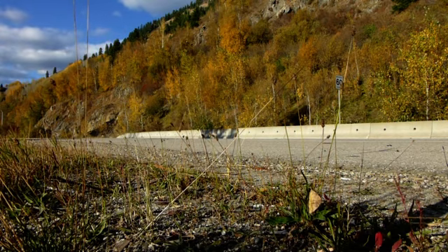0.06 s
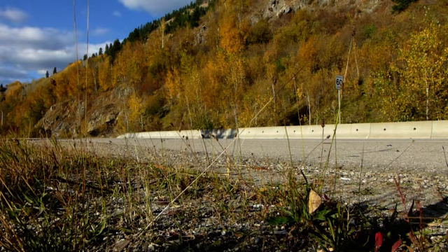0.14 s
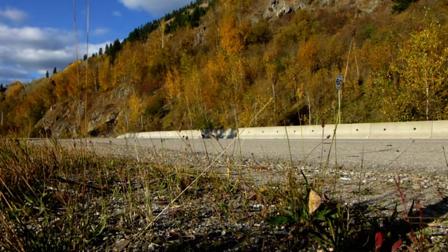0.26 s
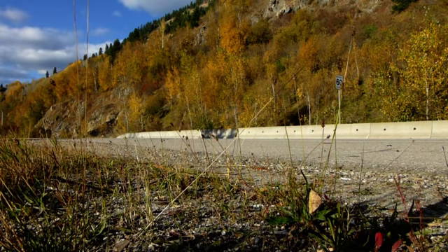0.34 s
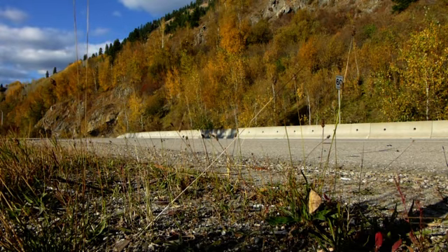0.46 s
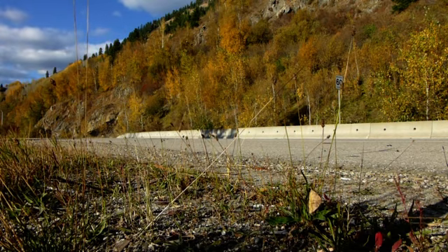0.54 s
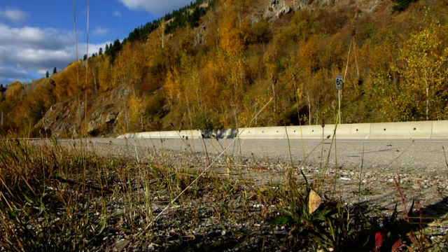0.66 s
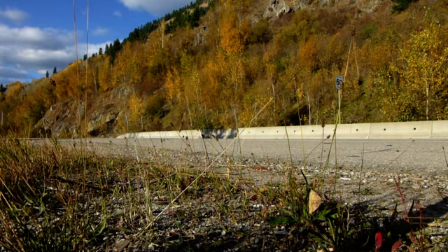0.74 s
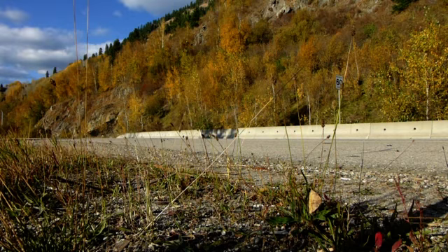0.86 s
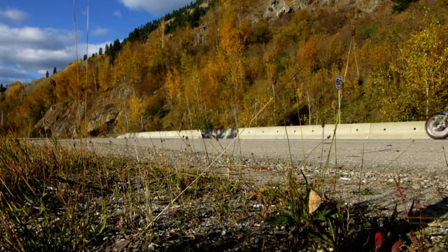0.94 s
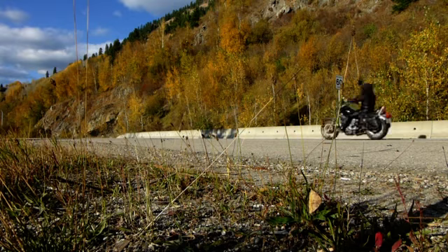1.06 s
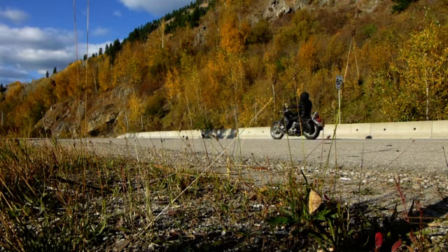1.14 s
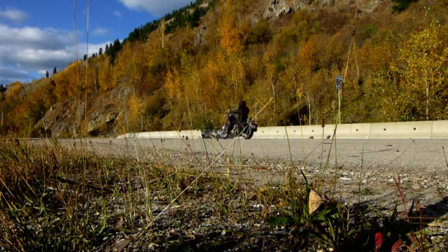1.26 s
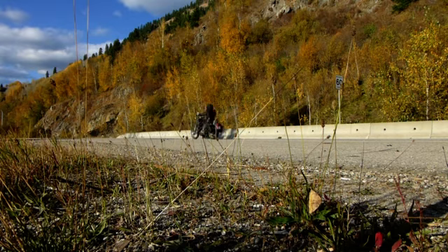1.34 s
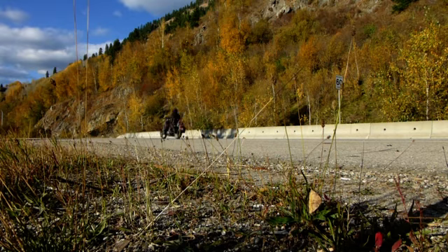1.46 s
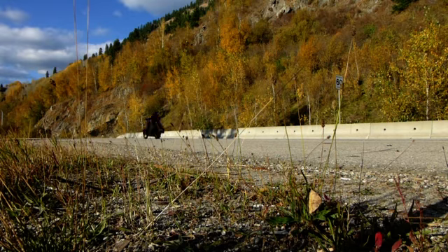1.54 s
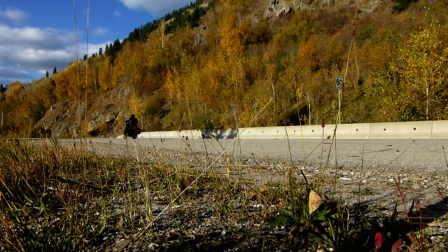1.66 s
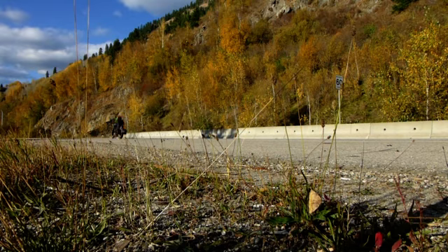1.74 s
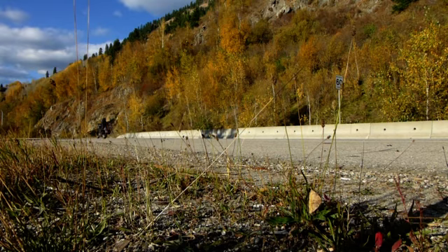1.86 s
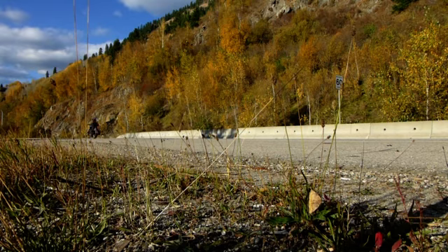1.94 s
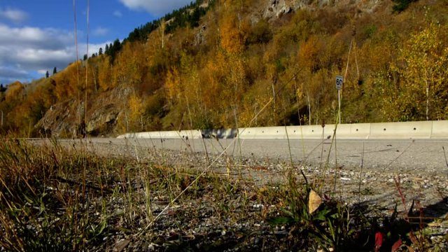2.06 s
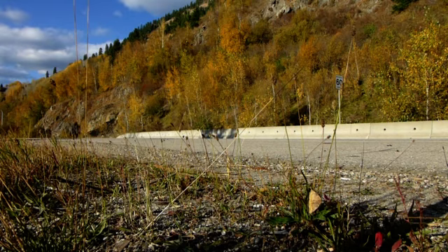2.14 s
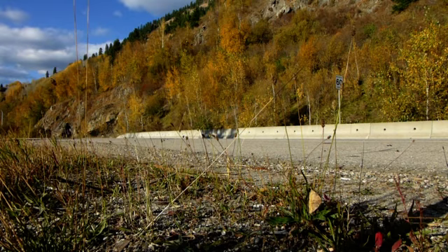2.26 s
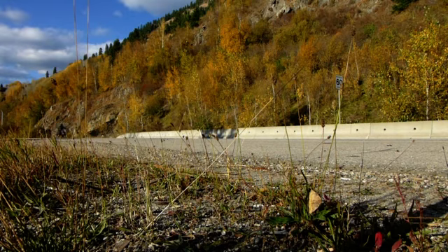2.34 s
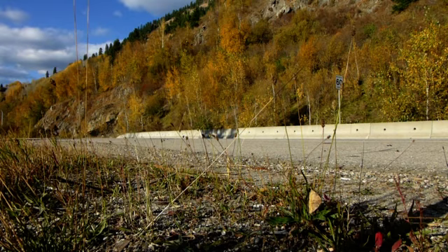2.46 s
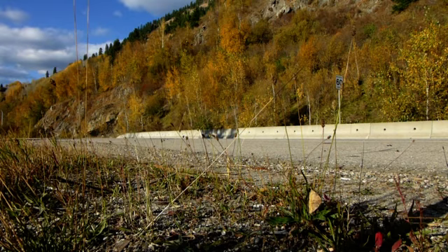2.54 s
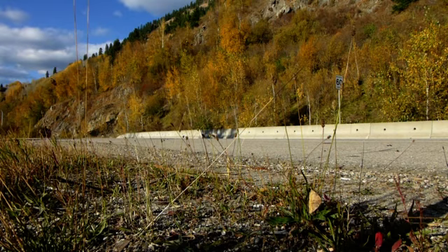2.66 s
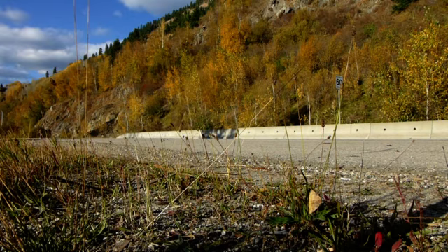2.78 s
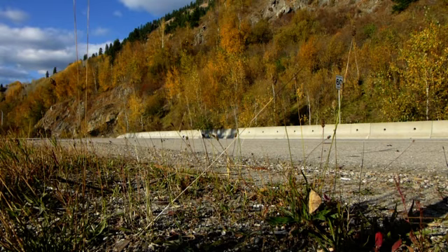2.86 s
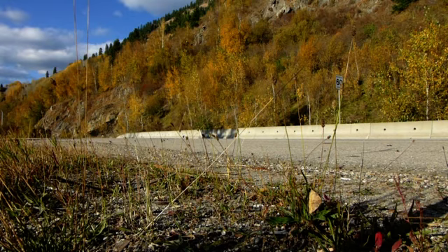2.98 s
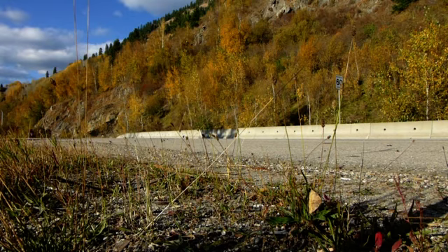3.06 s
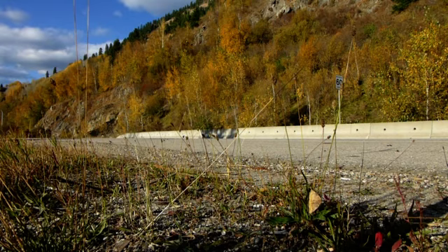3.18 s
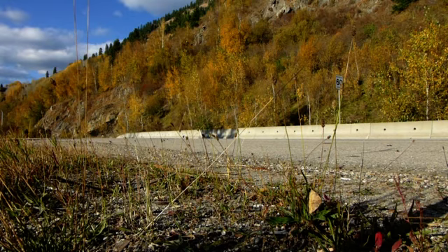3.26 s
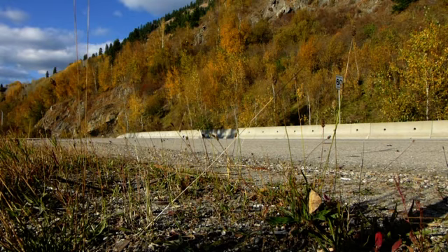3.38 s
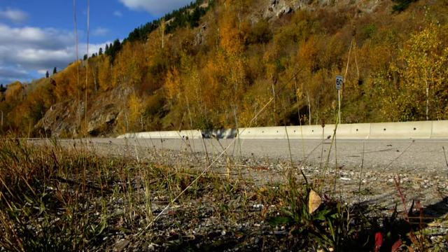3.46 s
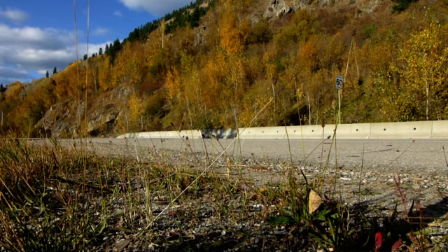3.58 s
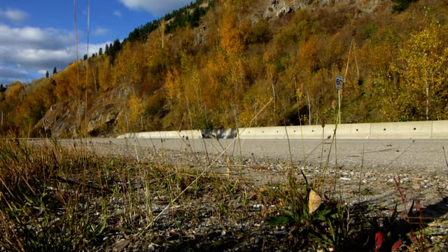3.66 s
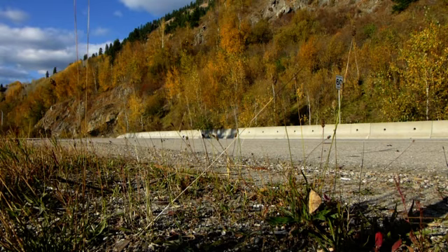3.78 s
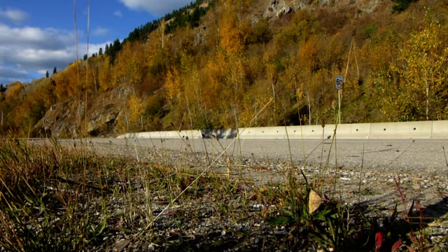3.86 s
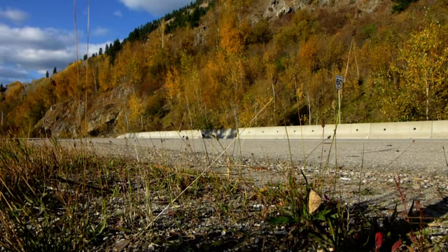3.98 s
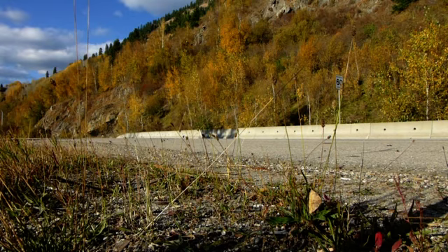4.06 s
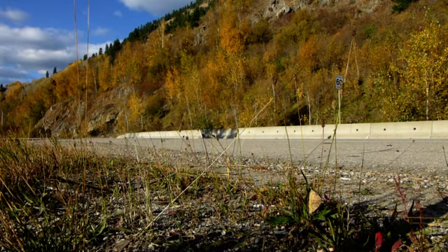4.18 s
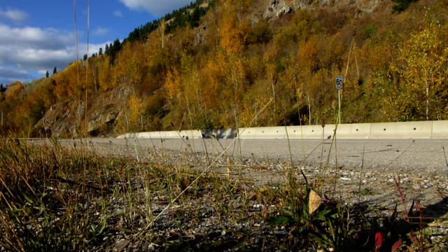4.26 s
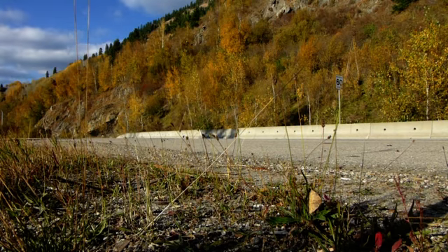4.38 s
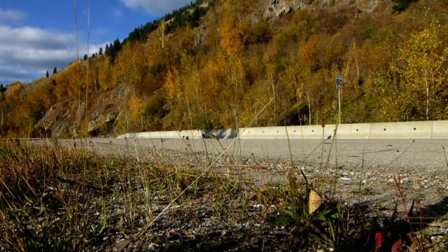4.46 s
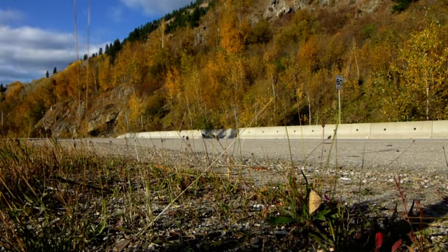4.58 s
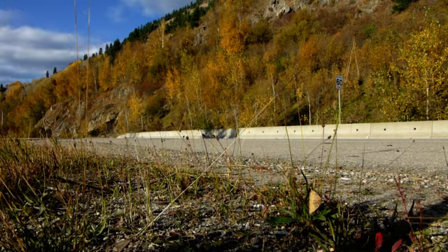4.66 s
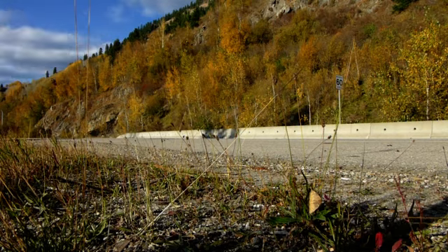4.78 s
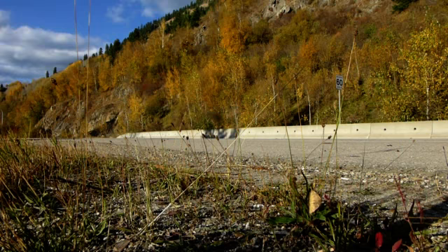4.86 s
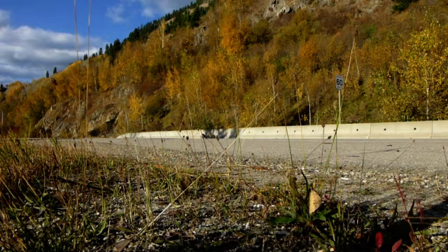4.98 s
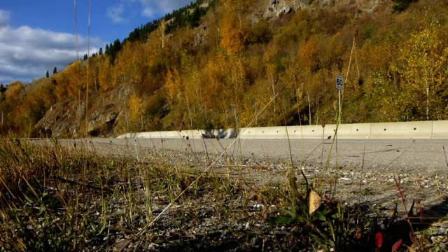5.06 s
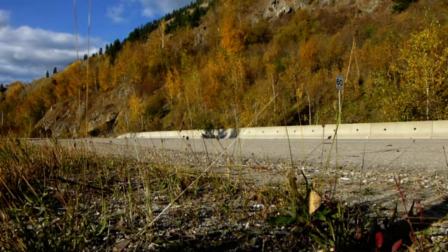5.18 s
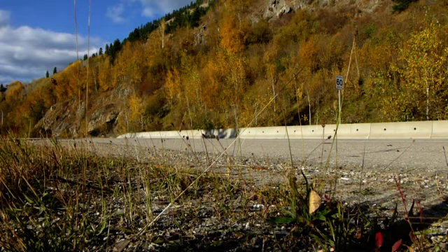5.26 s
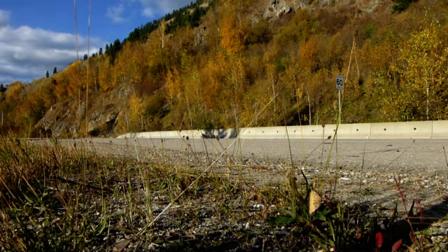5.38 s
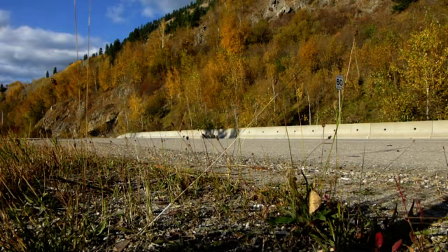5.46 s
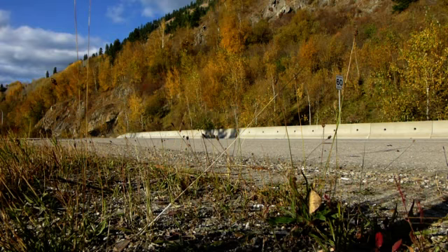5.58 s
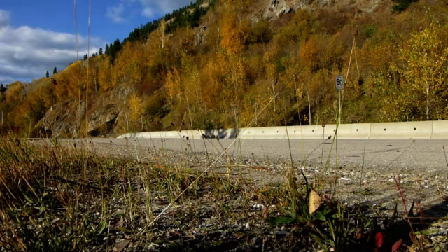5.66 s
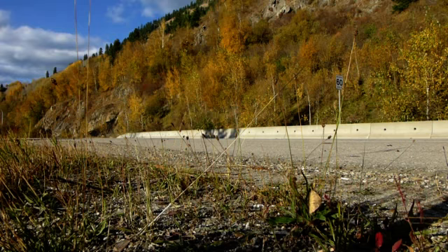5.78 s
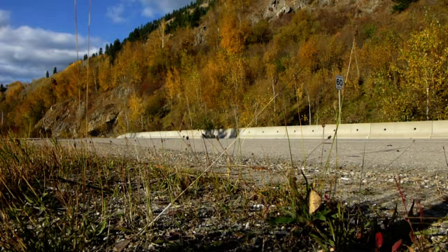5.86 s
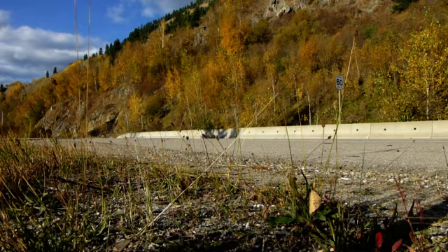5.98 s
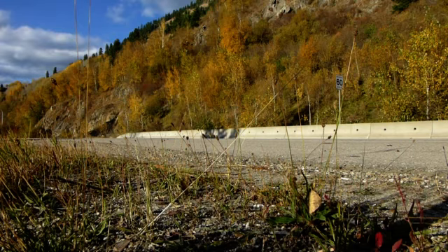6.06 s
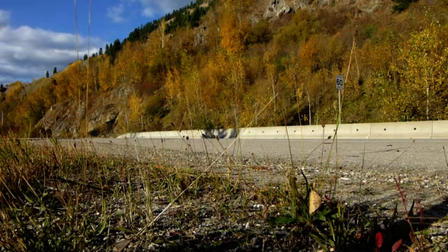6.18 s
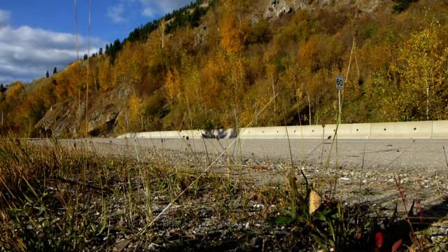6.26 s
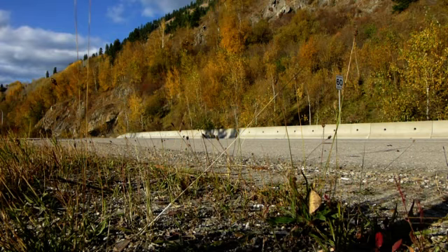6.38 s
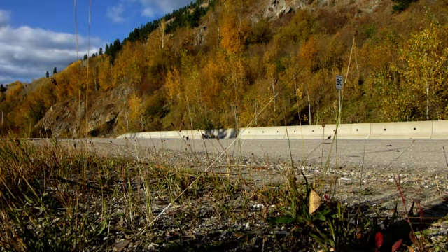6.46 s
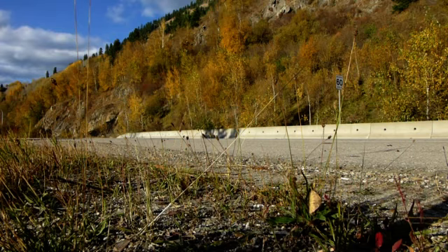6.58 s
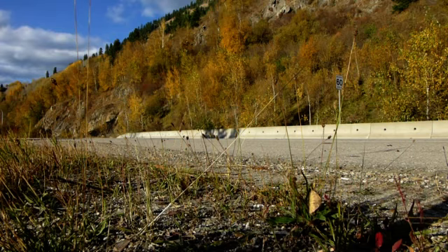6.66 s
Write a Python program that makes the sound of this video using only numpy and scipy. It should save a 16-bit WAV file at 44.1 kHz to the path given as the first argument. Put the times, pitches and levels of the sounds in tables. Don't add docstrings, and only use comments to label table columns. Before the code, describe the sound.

A twin-cylinder motorcycle roars past from right to centre, shifts gear, coasts off and backfires, then another rolls up idling with a thin brake squeal.

```python
import sys
import numpy as np
from scipy import signal
from scipy.fft import rfft, irfft, next_fast_len
from scipy.io import wavfile
from scipy.ndimage import uniform_filter1d

SR = 44100
rng = np.random.default_rng(int(sys.argv[2]) if len(sys.argv) > 2 else 0)


def persist_wave(psi):
    counts = np.round(np.clip(psi, -1, 1) * 32767).astype(np.int16)
    wavfile.write(sys.argv[1], SR, np.atleast_2d(counts).T)


def convert_level_to_amplitude(level_db):
    exponent = np.asarray(level_db, float) / 20
    return 10 ** exponent


N = 296339

FIRST_FIRING, SECOND_CYLINDER = .1, 5 / 12
SHUT_S = (2.11, 2.29)
CENTRED_S = 1.24
# (time [s], column of the order table [index], level [dB])
STAGES = [
    (0, 0, 0),
    (.74, 1, -3),
    (.935, 0, 1),
    (1.14, 2, 0),
    (2.29, 3, -1),
]

IDLE_STARTS_S = 4.486
BRAKE_RELEASE_S = 5.16


def seconds():
    return np.arange(N) / SR


def in_time(rows):
    s, *columns = np.transpose(rows)
    return [np.interp(seconds(), s, c) for c in columns]


def stage_rows():
    return np.searchsorted(np.transpose(STAGES)[0], seconds(), "right") - 1


def by_stage(table, size):
    return uniform_filter1d(np.array(table, float)[stage_rows()].T, size=size, axis=1)


def rms_one(x):
    return x / np.sqrt(np.mean(x ** 2) + 1e-20)


def evened(x):
    return x / np.sqrt(uniform_filter1d(x ** 2, size=6000) + 1e-9)


def cut(x, hz, kind, order=2):
    return signal.sosfilt(signal.butter(order, hz, kind, fs=SR, output="sos"), x)


def coloured(spectrum):
    hz, db = np.transpose(spectrum)
    size = next_fast_len(N)
    bin_hz = np.arange(size // 2 + 1) * SR / size
    gain = convert_level_to_amplitude(np.interp(np.log(bin_hz + 1), np.log(hz), db))
    return rms_one(irfft(rfft(rng.standard_normal(size)) * gain, size)[:N])


def clicks_at(at_s, sizes):
    out = np.zeros(N)
    at = np.round(np.asarray(at_s) * SR).astype(int)
    inside = (at >= 0) & (at < N)
    np.add.at(out, at[inside], (sizes * np.ones(len(at)))[inside])
    return out


def fall(clicks, decay_s):
    return signal.lfilter([1], [1, -np.exp(-1 / (decay_s * SR))], clicks + 1e-18)


def ring(clicks, modes):
    out = 0
    for k, (hz, db, t60_s) in enumerate(modes):
        r, w = convert_level_to_amplitude(-60 / (t60_s * SR)), 2 * np.pi * hz / SR
        mode = signal.lfilter([0, convert_level_to_amplitude(db) * np.sin(w)], [1, -2 * r * np.cos(w), r * r], clicks + 1e-18)
        out = out + (-1) ** k * mode
    return out


def orders(turns, lag=.65, centre=8.0):
    # (multiple of cycle rate [1], approaching [dB], throttle shut [dB],
    # pulling away [dB], coasting [dB])
    order_db = [(2, -15, -16, -26, -28), (3, -35, -11.5, -21, -9), (4, -7.5, -11, -12, -5),
                (5, 0.5, -6.5, -1, 2.5), (6, -2.5, -13, -24, -10.5), (7, 3.5, 0, 3, -4.5),
                (8, -9, 1.5, -1.5, -4), (9, -6.5, 0.5, -6, -2.5), (10, -26, 5, -5, 4),
                (11, -7.5, -9, -22, -15.5), (12, -6, -11, -1.5, -1), (13, -15.5, -27, -9.5, -11.5),
                (14, -27, -22, -5, -11), (15, -9, -25, -9, -24.5), (16, -28, -42, -10, -19.5),
                (17, -25, -26, -33, -3.5), (18, -23, -35, -18, -19.5), (19, -20, -11, -44, -11)]
    k, *levels = np.transpose(order_db)
    _, stage, stage_db = np.transpose(STAGES)
    row = stage_rows()
    cycle, out = np.arange(1025) / 1024, 0
    for n, db in enumerate(levels):
        waves = FIRST_FIRING + SECOND_CYLINDER * np.array([1, 2, 3] if n % 2 else [0, 1])
        phase = np.angle(np.exp(-2j * np.pi * np.outer(k, waves)).sum(axis=1))
        phase -= 1.4 + lag * np.tanh((k - centre) / 3)
        shape = rms_one(convert_level_to_amplitude(db) @ np.cos(2 * np.pi * np.outer(k, cycle) + phase[:, None]))
        gate = uniform_filter1d(convert_level_to_amplitude(stage_db[row]) * (stage[row] == n), size=900)
        out = out + gate * np.interp(turns % 1, cycle, shape)
    return out


def exhaust_bark(blasts, upper_db):
    # (frequency [Hz], level [dB], t60 [s])
    throat_modes = [(593, 4, 0.012), (867, -2, 0.03)]
    # (frequency [Hz], level [dB], t60 [s])
    upper_modes = [(1090, 3, 0.012), (1950, -8.5, 0.005)]
    throat_db = np.interp(seconds(), (CENTRED_S, SHUT_S[1]), (-7, 2))
    lower = evened(convert_level_to_amplitude(throat_db) * ring(blasts, throat_modes[:1]) - ring(blasts, throat_modes[1:]))
    bark = lower + convert_level_to_amplitude(upper_db + 16) * evened(ring(blasts, upper_modes))
    return evened(cut(cut(bark, 370, "high"), 2640, "low", order=4))


def reflected(layer, echo_db):
    # (time [s], delay [s])
    delays = [
        (0, .010),
        (.72, .0265),
        (1.15, .030),
        (1.3, .028),
        (2.28, .011),
    ]
    delay_s, = in_time(delays)
    late = np.interp(np.arange(N) - delay_s * SR, np.arange(N), layer)
    return (layer + convert_level_to_amplitude(echo_db) * late) / np.sqrt(1 + convert_level_to_amplitude(2 * echo_db))


def receding(top_db, coming, going):
    closest_s, pass_s, shut_loss_db = 0.99, 0.31, 6.5
    t = seconds() - closest_s
    loss_db = 10 * np.log10(1 + (t / pass_s) ** 2)
    return top_db - np.where(t < 0, coming, going) * loss_db - np.interp(seconds(), SHUT_S, [0, shut_loss_db])


def flow_noise(gusts):
    # (frequency [Hz], density [dB per Hz])
    jet_spectrum = [(710, -3), (1200, -9), (1310, -6), (1540, -7.5), (3160, -18), (4060, -21.5),
                    (4380, -32), (5000, -25), (6500, -45), (11000, -120)]
    # (frequency [Hz], density [dB per Hz])
    rush_spectrum = [(1880, -7.5), (3200, -12), (4400, -6), (4860, -6), (10500, -15), (11700, -19.5),
                     (12800, -39), (16600, -62), (22000, -120)]
    # (frequency [Hz], level [dB], t60 [s])
    case_modes = [(873, -3.5, 0.064), (1150, 1.5, 0.036), (1712, -14, 0.061), (2473, -11.5, 0.057),
                  (2718, -14, 0.069), (3180, -9.5, .04)]
    road_db = -68.5
    jet = convert_level_to_amplitude(receding(-27, 0.29, 0.92)) * evened((1.4 + gusts) * coloured(jet_spectrum))
    rush_gain = np.hypot(convert_level_to_amplitude(receding(-36, 0.99, 1.344)), convert_level_to_amplitude(road_db))
    rush = rush_gain * evened((0.5 + gusts) * coloured(rush_spectrum))
    shaken = ring(gusts * rng.standard_normal(N), case_modes)
    cases = convert_level_to_amplitude(receding(-30, 0.76, 1.94)) * evened(cut(shaken, 730, "high", order=4))
    return jet + rush + cases


def passing(lead_s=0.0904, rear_db=1.5):
    # (time [s], four-stroke cycle rate [1/s])
    cycle_rate = [(0, 39.07), (.76, 39.11), (.94, 34.31), (1.0, 36.72), (1.055, 42.91), (1.16, 29.97),
                  (1.5, 28.87), (2.15, 28.77), (2.3, 28.33), (3.0, 27.64), (4.6, 24.19)]
    # (time [s], level [dB])
    exhaust_level = [(0, -15), (.27, -12.5), (.75, -13), (.93, -12.5), (1.3, -17.5), (1.52, -14),
                     (2.13, -16.5), (2.42, -26.5), (2.95, -27), (3.3, -29), (4.11, -27.5), (4.5, -30.5)]
    # (turbulence [dB], crispness [0-1], bark [dB],
    # upper bark [dB], reflection [dB])
    burns = [(-10.5, 0.44, -16.5, -17, -8), (-10, 0.3, -12, -19, -15), (-8.5, 0.8, -13.5, -7, -24),
             (-9.5, 0.71, -12, -21.5, -8), (-8.5, 0.18, -11.5, -22.5, -20.5)]
    # (frequency [Hz], level [dB], t60 [s])
    pipe_modes = [(146, -24.5, 0.11), (193, 3, 0.022), (269, -3.5, 0.05), (362, 2, 0.032),
                  (483, -5.5, 0.038)]
    tone_db, = in_time(exhaust_level)
    swirl_db, crisp, bark_db, upper_db, echo_db = by_stage(burns, size=3000)
    crisp = np.clip(crisp, 0, 1)

    turns = np.cumsum(in_time(cycle_rate)[0]) / SR
    jitter, burn_db = rng.standard_normal((2, 400))
    fired = np.add.outer(np.arange(200), [0, SECOND_CYLINDER]).ravel() + FIRST_FIRING
    at_s = np.interp(fired - lead_s, turns, seconds(), right=99) + .00007 * jitter
    pulses = clicks_at(at_s, convert_level_to_amplitude(np.tile([0, rear_db], 200) + .8 * burn_db))
    gusts = evened(1.3 * (1 - crisp) + crisp * evened(fall(pulses, 0.0046)))

    tone = orders(turns) * convert_level_to_amplitude(np.interp(turns, fired, burn_db))
    swirl = ring(gusts * rng.standard_normal(N), pipe_modes)
    tone += convert_level_to_amplitude(swirl_db) * evened(cut(swirl, 120, "high"))
    blasts = crisp * evened(pulses) + (1 - crisp) * gusts * rng.standard_normal(N)
    bark = exhaust_bark(blasts, upper_db)

    out = convert_level_to_amplitude(tone_db) * reflected(tone, echo_db)
    out += convert_level_to_amplitude(tone_db + bark_db) * reflected(bark, echo_db)
    out += flow_noise(gusts)
    return out * np.interp(seconds(), (4.56, 4.67), (1, 0))


def wind():
    # (frequency [Hz], density [dB per Hz])
    wind_spectrum = [(10, -7), (25, 5), (50, -6), (90, -24), (200, -67)]
    return convert_level_to_amplitude(-84) * np.array([coloured(wind_spectrum), coloured(wind_spectrum)])


def backfires():
    # (time [s], peak [dB], ring [Hz])
    pops = [
        (4.213, -0.5, 634),
        (4.756, -6, 580),
    ]
    out = 0
    for s, db, hz in pops:
        out = out + ring(clicks_at([s + 0.00183], convert_level_to_amplitude(db)), [(225, -11, .04), (hz, 4, .007), (1250, -8, .004)])
    return cut(out, 1700, "low", order=4)


def fading_in(s):
    faded_db, fade_in_s = 22.5, 0.2
    return faded_db * np.exp(np.clip((IDLE_STARTS_S - s) / fade_in_s, -50, 2))


def firings(count=18):
    # (cycle [number], early [s], front loss [dB], rear loss [dB])
    stumbles = [
        (6, .0042, 7, 4.5),
        (8, 0, 2, 1),
        (10, .0038, .5, .5),
        (11, .0042, 1, 5),
        (16, .002, 2, 0),
        (17, .0042, 0, 0),
    ]
    first_s, cycle_s, rear_lag_s = 4.489, .1262, .0485
    rolling_s, settles_at, settles_over = .0056, 3.8, .5
    front_db, rear_db, recovery = -11, -4.5, 0.65
    n = np.arange(count)
    cycle, *rest = np.transpose(stumbles)
    early_s, front_loss_db, rear_loss_db = [np.bincount(cycle.astype(int), c, count) for c in rest]
    length_s = cycle_s - rolling_s / (1 + np.exp((n - settles_at) / settles_over)) - early_s
    front_s = first_s + np.cumsum(length_s) - length_s[0]
    rear_s = front_s + rear_lag_s + rng.normal(0, .0006, count)
    rear_loss_db = signal.lfilter([1], [1, -recovery], rear_loss_db)
    return (np.transpose([front_s, front_db - front_loss_db - fading_in(front_s)]),
            np.transpose([rear_s, rear_db - rear_loss_db - fading_in(rear_s)]))


def silencer(fired, waves, tones):
    s, db = np.transpose(fired)
    kicks = sum(clicks_at(s + delay_s, sign * convert_level_to_amplitude(db + wave_db + rng.normal(0, 1, len(s))))
                for delay_s, wave_db, sign in waves)
    puff = 0
    for hz, climb, level_db, t60_s, late_s in tones:
        t = np.maximum(np.arange(SR // 5) / SR - late_s, 0)
        envelope = convert_level_to_amplitude(level_db - 60 * t / t60_s) * (1 - np.exp(-t / .0005))
        puff = puff + envelope * np.sin(2 * np.pi * (hz + climb * t / 2) * t)
    return signal.fftconvolve(kicks, puff)[:N]


def thumps(fronts, rears):
    # (delay after firing [s], level [dB], sign [1])
    front_waves = [(-.0028, -10, 1), (.0024, 0, -1)]
    # (delay after firing [s], level [dB], sign [1])
    rear_waves = [(-.0137, -14, 1), (-.0041, -5, -1), (.0024, 0, -1), (.0123, -13.5, 1)]
    # (frequency [Hz], climb [Hz/s], level [dB], t60 [s], onset delay [s])
    front_tones = [(195, 1550, 5.5, .064, .0008), (362, 6800, -8.5, .039, 0)]
    # (frequency [Hz], climb [Hz/s], level [dB], t60 [s], onset delay [s])
    rear_tones = [(179, 920, -4.8, .21, .003), (258, 6000, -5, .059, .003), (238, 0, -10.6, .1, 0)]
    return silencer(fronts, front_waves, front_tones) + silencer(rears, rear_waves, rear_tones)


def port_cracks(fronts):
    # (frequency [Hz], level [dB], t60 [s])
    port_modes = [(814, -16, 0.046), (1053, -11.5, 0.027), (1730, -38, 0.0062)]
    s, db = fronts.T
    clicks = clicks_at(s, convert_level_to_amplitude(db)) + 0.89 * clicks_at(s + 0.00536, convert_level_to_amplitude(db))
    return cut(ring(clicks, port_modes), 2300, "low")


def valves(front_s):
    # (share of cycle [1], level [dB], decay [s], ring [Hz])
    contacts = [(.07, -5, .006, 3800), (.22, -1, .004, 5600), (.27, -4, .005, 4600), (.41, -6, .009, 3900),
                (.6, -5, .003, 4500), (.74, -2, .005, 4900), (.965, 0, .007, 9000)]
    # (frequency [Hz], density [dB per Hz])
    rattle_spectrum = [(1760, 3), (3000, -1), (4010, -15), (4370, -7), (4730, -2.5), (8620, -2.5),
                       (11400, -8), (12800, -33), (16600, -67), (22000, -120)]
    # (frequency [Hz], level [dB], t60 [s])
    cover_modes = [(2455, -5, 0.064), (3415, 1.5, 0.11), (4150, 11, 0.038), (4620, 0, .05),
                   (5110, -5, 0.07), (6430, -10, .05), (7380, -6, .03)]
    cycle_s = np.diff(front_s, append=2 * front_s[-1] - front_s[-2])
    rattle, beat, rings = coloured(rattle_spectrum), .2, 0
    for share, tick_db, decay_s, hz in contacts:
        sizes = convert_level_to_amplitude(tick_db + rng.normal(0, 2.3, len(front_s)))
        burst = fall(clicks_at(front_s + share * cycle_s, sizes), decay_s)
        beat = beat + burst
        rings = rings + ring(burst * rattle, [(hz, -16, .004)])
    ticks = beat * rattle + rings
    covers = convert_level_to_amplitude(-8.5) * np.std(ticks) * rms_one(ring(beat * rattle, cover_modes))
    return ticks + covers, beat


def idling():
    # (frequency [Hz], density [dB per Hz])
    casing_spectrum = [(250, -20), (430, 1), (617, -9.5), (1070, -6), (1300, -13.5), (1770, -14),
                       (2280, -30), (2480, -22.5), (3200, -27), (4040, -22.5), (4340, -28.5), (4990, -27),
                       (7000, -39.5), (9100, -66), (15400, -120)]
    fronts, rears = firings()
    front_s, rear_s = fronts[:, 0], rears[:, 0]
    clatter, beat = valves(front_s)
    chuffs = fall(clicks_at(np.r_[front_s, rear_s], 0.55), 0.0069)
    t = seconds()
    heard = np.interp(t, [IDLE_STARTS_S - .09, IDLE_STARTS_S], [0, 1])
    ticks = convert_level_to_amplitude(-43.5 - 0.81 * fading_in(t)) * clatter * 1.42
    casing_db = -29.5 - 0.68 * fading_in(t) - 1.5 * (t - BRAKE_RELEASE_S)
    casing = convert_level_to_amplitude(casing_db) * (0.6 + 0.25 * beat + chuffs) * coloured(casing_spectrum)
    return thumps(fronts, rears) + port_cracks(fronts) + heard * (ticks + casing)


def squeal():
    touch_s, bite_s, end_s = 4.58, 4.7, 5.209
    touch = convert_level_to_amplitude(-22)
    throb_db, throb_s = 1, 0.173
    t = seconds()
    grip = np.interp(t, [touch_s - .03, touch_s, bite_s - .02, bite_s + 0.022, BRAKE_RELEASE_S, end_s],
                     [0, touch, touch, 1, .75, 0])
    level_db = -49 + throb_db * np.cos(2 * np.pi * (t - bite_s + 0.045) / throb_s)
    return np.sqrt(2) * convert_level_to_amplitude(level_db) * grip * np.sin(2 * np.pi * 8541 * t)


def placed(x, side_db, scatter_db, bass_db=-30, tail_s=0.016):
    lean = np.tanh(side_db * np.log(10) / 40)
    scatter = rng.standard_normal(SR // 8) * np.exp(-np.arange(SR // 8) / SR / tail_s)
    scattered = signal.fftconvolve(x, scatter / np.linalg.norm(scatter))[:N]
    treble = signal.sosfiltfilt(signal.butter(3, 640, "high", fs=SR, output="sos"), x)
    side = 1.22 * lean * treble
    side += convert_level_to_amplitude(scatter_db) * cut(cut(scattered, 420, "high"), 3100, "high", order=1)
    side += convert_level_to_amplitude(bass_db) * scattered
    return np.array([x + side, x - side])


def scene():
    swing_s = 0.095
    side_db = -8 * (1 - np.tanh((seconds() - CENTRED_S) / swing_s)) / 2
    far = placed(passing() + backfires(), side_db, scatter_db=-8.0)
    near = placed(idling() + squeal(), -8, scatter_db=-6.5)
    bass_cut = signal.butter(2, 92, "high", fs=SR, output="sos")
    return signal.sosfiltfilt(bass_cut, far + near) + wind()


def low_pass(x):
    return signal.sosfilt(signal.butter(12, 12930, fs=SR, output="sos"), x)


def record(dry):
    mix = 1.665 * np.tanh(dry / 1.533)
    return low_pass(mix)


dry = scene()
out = record(dry)
persist_wave(out)
```